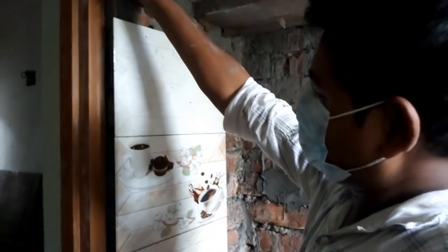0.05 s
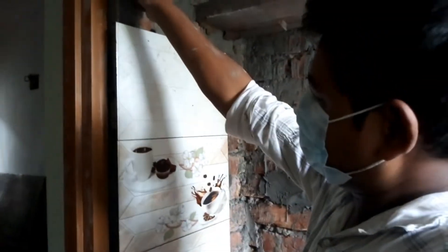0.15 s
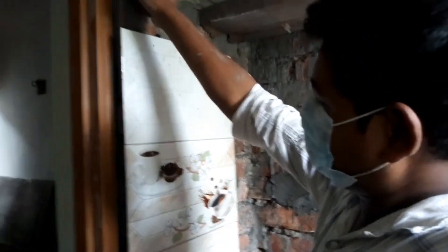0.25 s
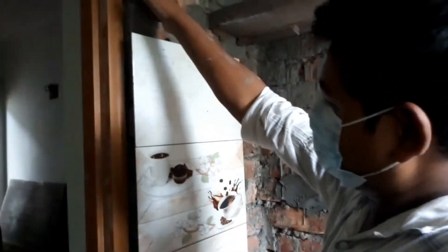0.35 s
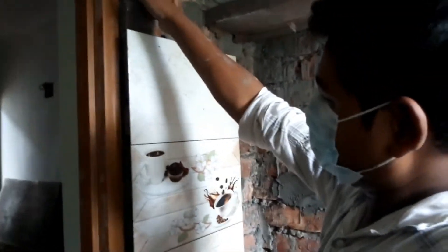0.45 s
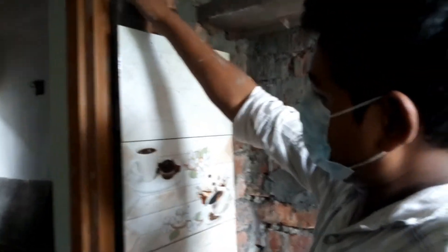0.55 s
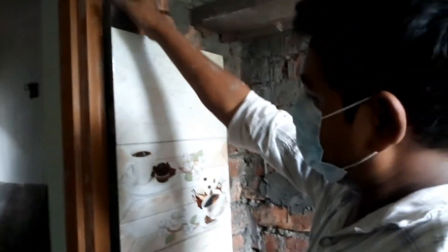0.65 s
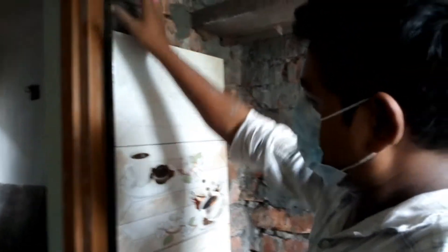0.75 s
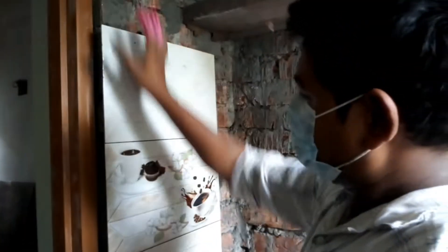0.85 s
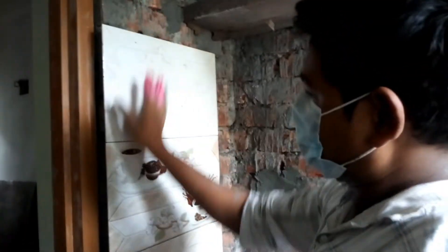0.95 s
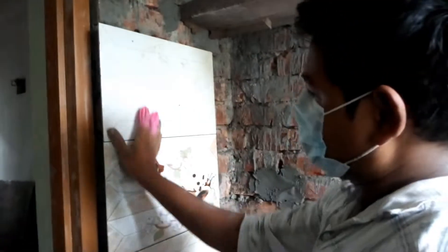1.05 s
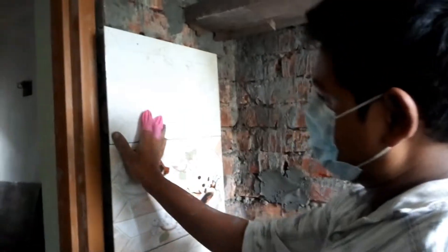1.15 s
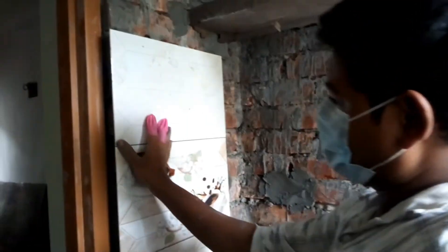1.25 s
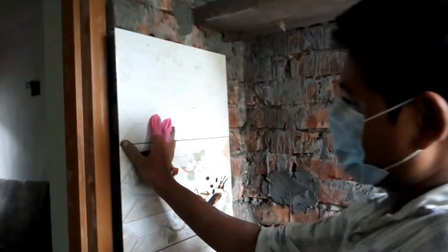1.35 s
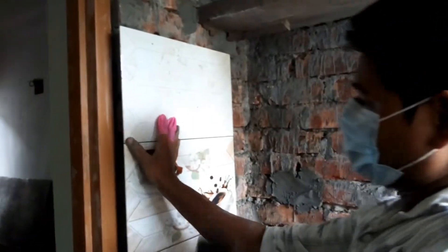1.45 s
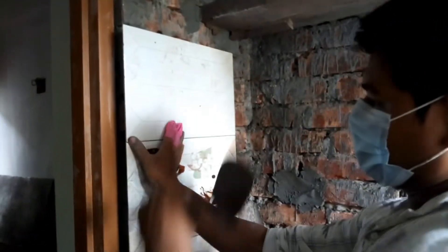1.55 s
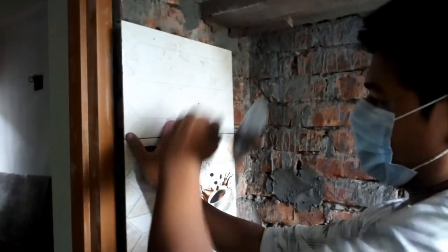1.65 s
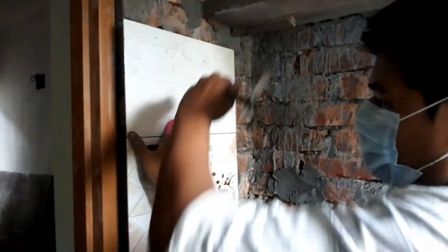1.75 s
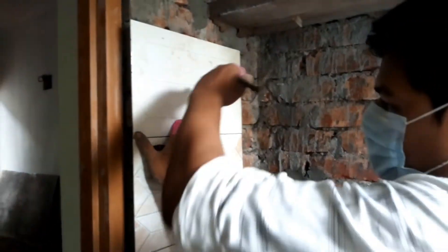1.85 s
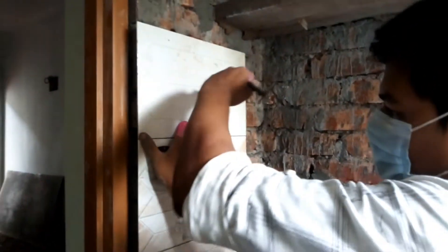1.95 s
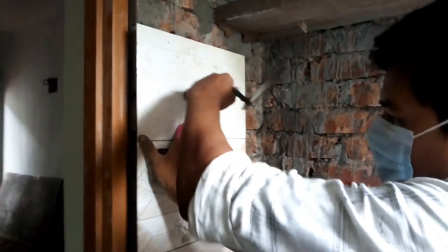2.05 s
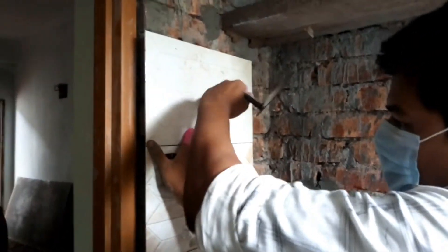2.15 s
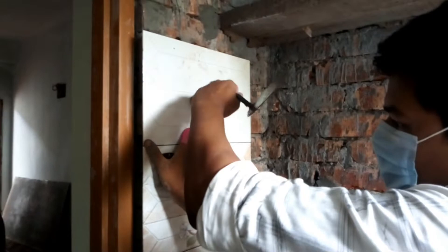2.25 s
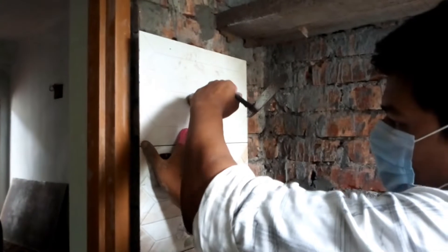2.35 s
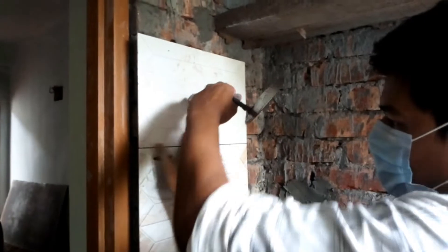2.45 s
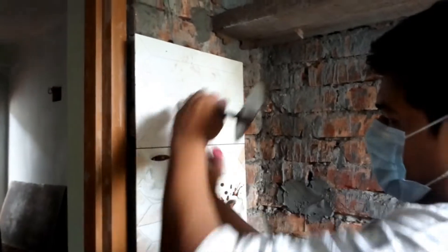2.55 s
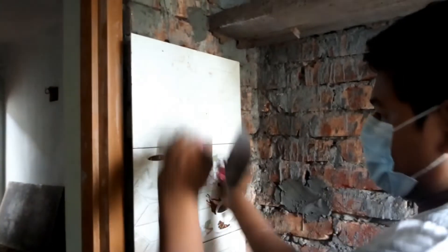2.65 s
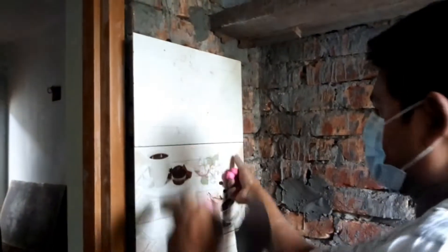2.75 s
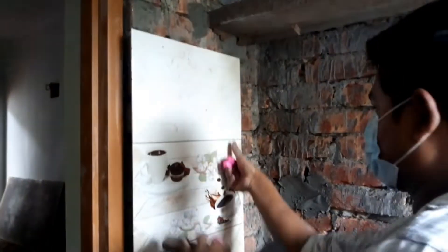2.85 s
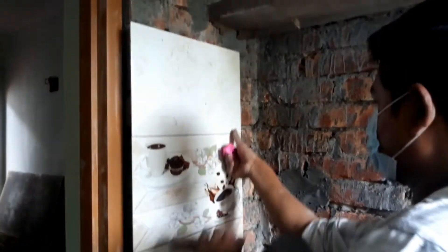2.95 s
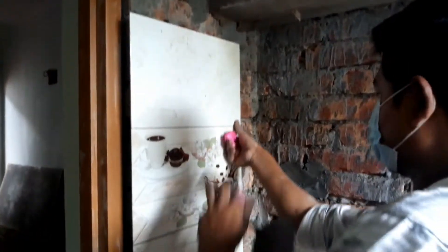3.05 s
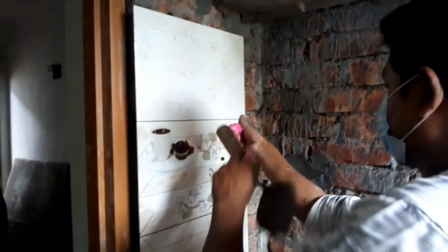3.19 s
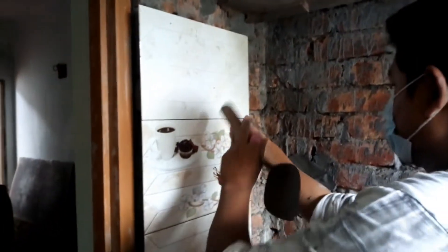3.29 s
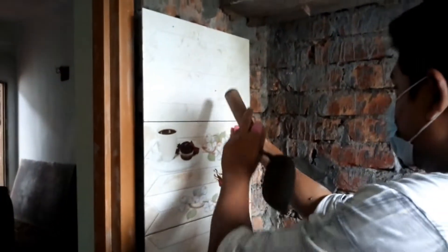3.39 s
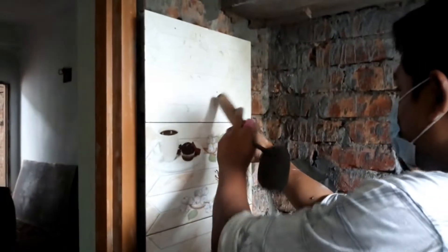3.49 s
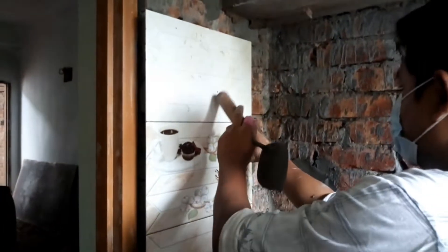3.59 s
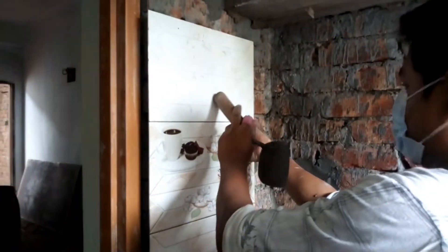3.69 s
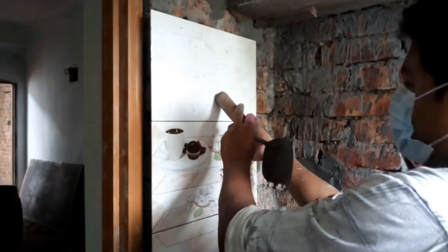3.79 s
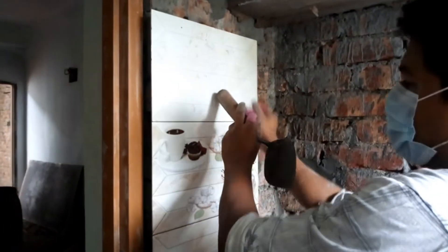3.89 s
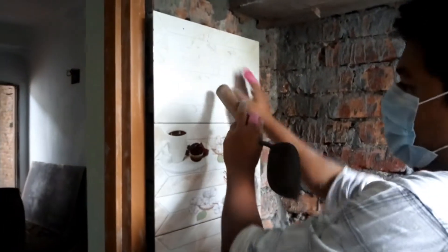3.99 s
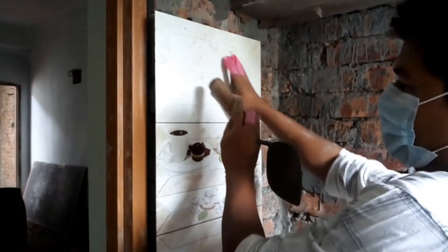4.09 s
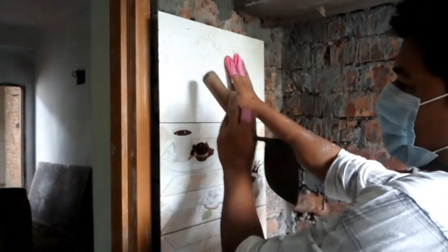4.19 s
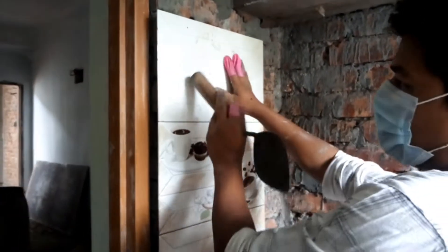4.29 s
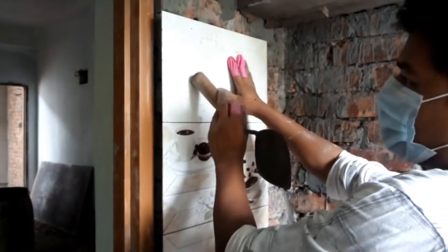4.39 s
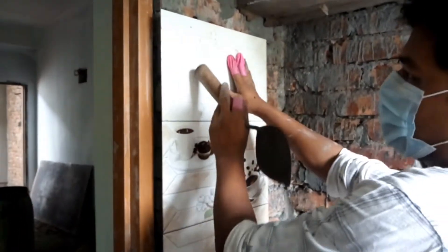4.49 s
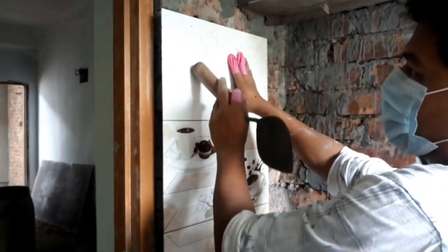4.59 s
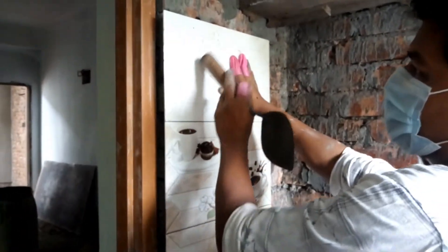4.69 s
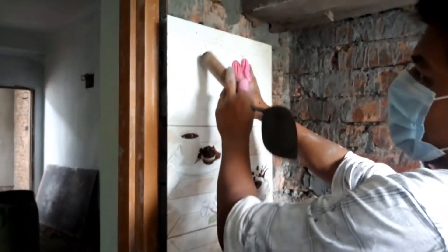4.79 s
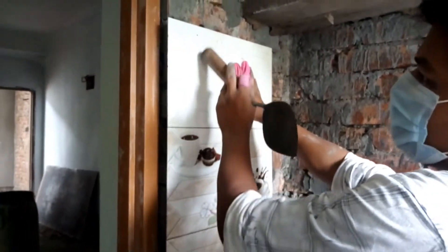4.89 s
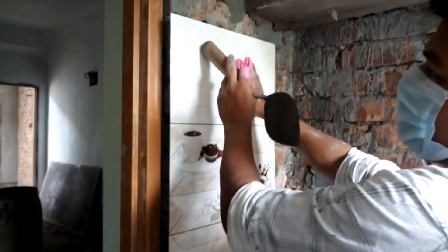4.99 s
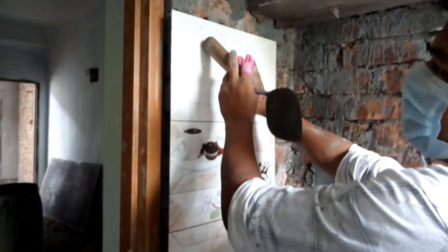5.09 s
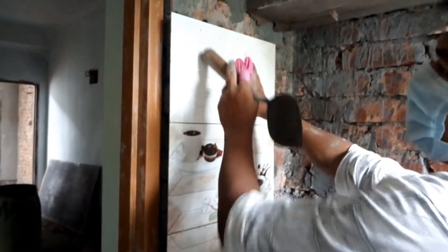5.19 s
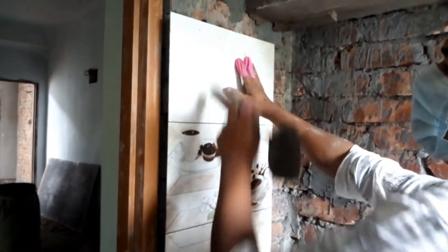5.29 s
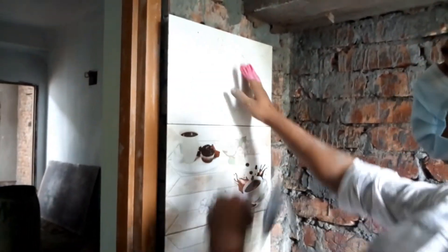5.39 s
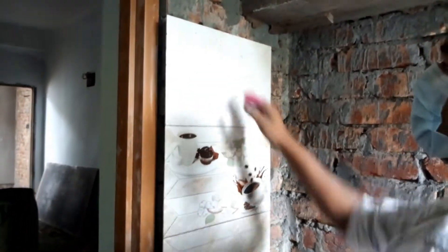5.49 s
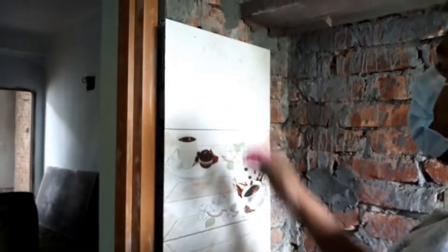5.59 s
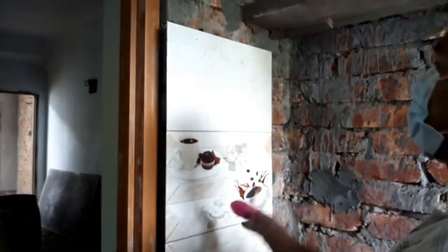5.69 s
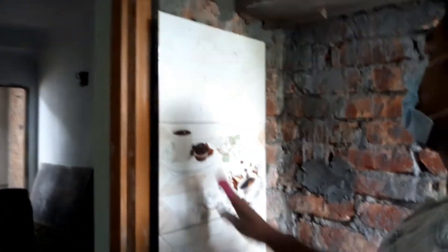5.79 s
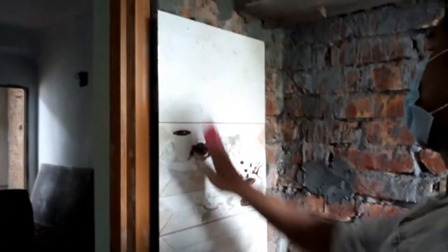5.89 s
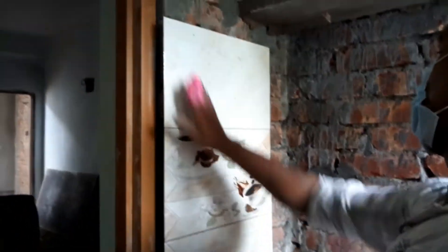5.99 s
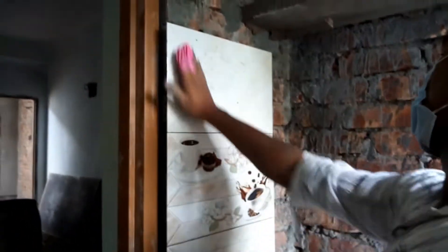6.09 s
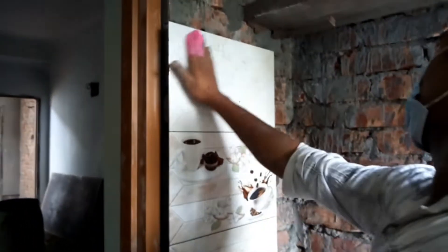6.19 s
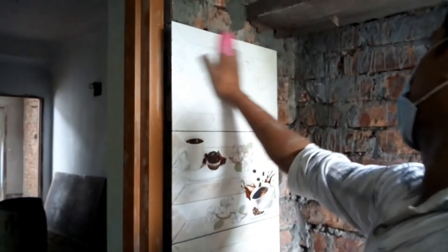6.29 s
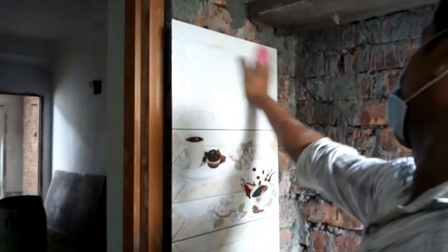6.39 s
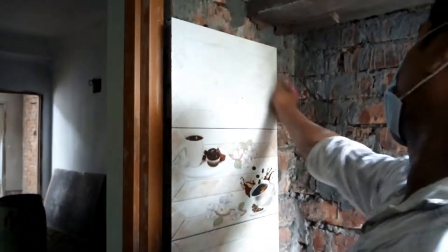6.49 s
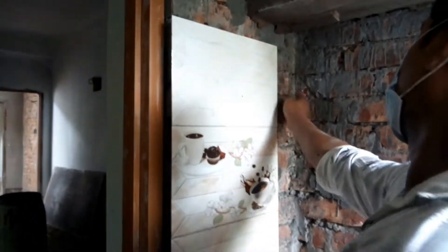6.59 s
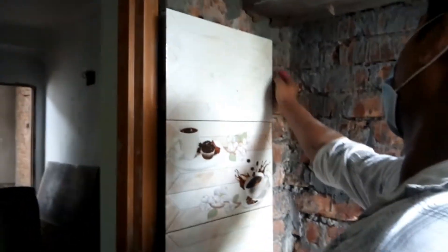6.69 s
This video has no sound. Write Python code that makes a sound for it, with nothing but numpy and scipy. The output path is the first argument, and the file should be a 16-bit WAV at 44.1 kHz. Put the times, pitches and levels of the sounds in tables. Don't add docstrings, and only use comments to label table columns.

```python
import sys
import numpy as np
from scipy import signal
from scipy.fft import rfft, irfft, next_fast_len
from scipy.io import wavfile

SR = 44100
rng = np.random.default_rng(int(sys.argv[2]) if len(sys.argv) > 2 else 0)


def natural_amplitude(level_db):
    exponent = np.asarray(level_db, float) / 20
    return 10 ** exponent


def materialize(psi):
    bounded = np.clip(np.atleast_2d(psi).T, -1, 1)
    quanta = np.round(bounded * 32767).astype(np.int16)
    wavfile.write(sys.argv[1], SR, quanta)


N = 297234


def rms_one(x):
    return x / np.sqrt(np.mean(x ** 2) + 1e-20)


def at_hz(points, hz):
    table = np.array(points)
    return np.interp(np.log(hz), np.log(table[:, 0]), table[:, 1])


def band(x, low_hz, high_hz):
    edges = [low_hz, min(high_hz, .45 * SR)]
    return signal.sosfilt(signal.butter(2, edges, "band", fs=SR, output="sos"), x)


def drift(rate, size):
    knots = rng.standard_normal(int(size / SR * rate) + 2)
    return np.interp(np.arange(size) / SR * rate, np.arange(len(knots)), knots)


def ring(t, hz, t60, phase=0):
    return np.sin(2 * np.pi * hz * t + phase) * natural_amplitude(-60 * t / t60)


def add(out, s, x):
    i = round(s * SR)
    out[i:i + len(x)] += x[:len(out) - i]


# start in seconds, peak in dB, hardness as top Hz, tail in dB, blade in dB.
EDGE_HITS = [
    (2.046, -22, 507, -14, -40),
    (2.059, -7, 3020, -6, -18.5),
    (2.250, -9, 4500, -3.5, -15),
]
# frequency in Hz, level in dB, t60 in seconds.
EDGE_WALL_MODES = [(114.2, -18, 0.93), (168.8, -9, 0.33), (195.6, -29, 0.82), (245.2, -13.5, 1.1),
                   (294.2, -14.5, .9), (361.3, -14.5, 0.855), (458.5, -20, 0.77), (542, -23, 0.88),
                   (583, -27, 0.33), (684, -36.5, 0.6), (844, -29, 0.61)]


def edge_blows():
    return strike(EDGE_HITS, EDGE_WALL_MODES, modes_db=1.0, knock_hz=808, under_db=-3.0,
                  bright_db=6.5, full_boom_db=-0.4, boom_lasts=1.406)


# start in seconds, peak in dB, hardness as top Hz, tail in dB, blade in dB.
FACE_TAPS = [
    (4.370, -14, 952, -13.5, -35),
    (4.572, -8, 3250, -11, -25),
    (4.844, -8.5, 2800, -11, -30.5),
    (5.009, -7.5, 3440, -12, -29),
]
# frequency in Hz, level in dB, t60 in seconds.
FACE_WALL_MODES = [(112.82, -9, 0.94), (159.8, -1, 0.62), (292, -6.5, 0.54), (366, -18, 0.61),
                   (555, -3, 0.49), (656, -6, 0.56), (847, 1, 0.203), (915, -20, 0.79), (1037, -5.5, 0.21)]


def face_taps():
    return strike(FACE_TAPS, FACE_WALL_MODES, modes_db=-8.0, knock_hz=842.0, under_db=-6.0,
                  bright_db=1.0, full_boom_db=-1.0, boom_lasts=0.987)


# start in seconds, peak in dB, hardness as top Hz, tail in dB, blade in dB.
LOW_TAPS = [
    (3.571, -21.5, 820, -12, -45),
    (3.698, -6, 3340, -11, -27.5),
    (5.315, -52, 320, -10.5, -42),
]
# frequency in Hz, level in dB, t60 in seconds.
LOW_WALL_MODES = [(111.5, -8.5, 0.42), (162.5, -6, 0.52), (244.3, 0.5, 0.65), (323.95, 1, 0.55),
                  (520, 2, 0.2), (616, -1, 0.252), (798, -5.5, 0.45), (837, 1, 0.33)]


def low_face_taps():
    return strike(LOW_TAPS, LOW_WALL_MODES, modes_db=-10.0, knock_hz=674.0, under_db=-30.5,
                  bright_db=-1.0, full_boom_db=-1.1, boom_lasts=0.97)


# frequency in Hz, level in dB, t60 in seconds.
BLADE_MODES = [(1096, -5.5, 0.5), (1107, 2, 0.58), (1590, -10.5, 0.26), (1808, -10, 0.26),
               (2110, -11.5, 0.36), (3220, -16, 0.27)]
# frequency in Hz, width in Hz, level in dB.
TILE_PLATE_MODES = [(1343, 100, -7), (1590, 50, -9), (1845, 64, -5), (2203, 80, 1.5), (2640, 90, -4.5),
                    (2824, 75, -4), (3170, 70, 5.5)]
FULL_BLOW_DB, BOOM_PER_SOFT_DB = -11, 0.3518


def strike(hits, modes, modes_db, knock_hz, under_db, bright_db, full_boom_db, boom_lasts):
    out, t = np.zeros(N), np.arange(round(.95 * SR)) / SR
    for s, peak_db, top_hz, tail_db, blade_db in hits:
        boom_db = full_boom_db + BOOM_PER_SOFT_DB * (FULL_BLOW_DB - peak_db)
        knock = ring(t, knock_hz, 0.015) + natural_amplitude(under_db) * ring(t, knock_hz * 0.7018, 0.041)
        knock = -knock * (1 - np.exp(-(t / 0.00053) ** 2))

        wall = 0
        for hz, db, t60 in modes:
            chance, phase = rng.standard_normal(2)
            mode_db = db + 1.5 * chance + 4.7 * drift(22, len(t)) + boom_db * (hz < 400)
            wall = wall + natural_amplitude(mode_db) * ring(t, hz, t60, 3 * phase)
        wall = natural_amplitude(modes_db) * wall * (1 - np.exp(-(t / 0.0058) ** 2))

        blade = sum(natural_amplitude(db + 2.6 * drift(25, len(t))) * ring(t, hz, t60) for hz, db, t60 in BLADE_MODES)
        blade = blade * (1 - np.exp(-t / 0.014))

        diffuse = room_tail(t, boom_db, bright_db, boom_lasts)
        tail = diffuse
        for hz, width, db in TILE_PLATE_MODES:
            plate = band(diffuse, hz - width / 2, hz + width / 2)
            tail = tail + natural_amplitude(db + 1.2 * rng.standard_normal()) * plate

        blow = natural_amplitude(1.0) * knock + natural_amplitude(tail_db) * (tail + wall)
        soft = np.exp(-2 * np.pi * 1.4 * top_hz / SR)
        blow = signal.lfilter([1 - soft], [1, -soft], blow)
        blow = signal.sosfilt(signal.butter(8, top_hz, fs=SR, output="sos"), blow)
        add(out, s + 0.00049, natural_amplitude(peak_db) * (blow + natural_amplitude(blade_db) * blade))
    return out


# frequency in Hz, level in dB per Hz.
TAIL_COLOUR = [(18, -52), (30, -13.5), (60, -16), (146, -3.5), (229, 4), (417, -6.5), (540, -1.5),
               (811, -6), (902, -6), (1090, -13), (1220, -9), (2120, -18), (5000, -48), (6500, -76),
               (11000, -120)]
# frequency in Hz, t60 in seconds.
ROOM_DECAY = [(60, 0.69), (250, 0.74), (550, 0.53), (1200, 0.58), (2500, 0.25), (5000, 0.27)]


def room_tail(t, boom_db, bright_db, boom_lasts):
    edges = 40 * 2 ** np.arange(0, 7.2, 1 / 3)
    white, out = rng.standard_normal((2, len(t))), 0
    for k, (low, high) in enumerate(zip(edges, edges[1:])):
        hz = np.sqrt(low * high)
        tilt_db = at_hz([(300, boom_db), (500, 0.0044), (1000, 0.007), (2500, bright_db)], hz)
        colour_db = at_hz(TAIL_COLOUR, hz) + tilt_db
        rise = 1 - np.exp(-(t / (0.00067 + 3.7 / hz)) ** 2)
        t60 = at_hz(ROOM_DECAY, hz) * at_hz([(330, boom_lasts), (480, 0.96)], hz)
        level_db = colour_db + 2.08 * drift(13.75, len(t)) - 60 * t / t60
        out = out + natural_amplitude(level_db) * rise * band(white[k % 2], low, high)
    return natural_amplitude(12.5) * out


# start in seconds, level in dB, frequency in Hz, t60 in seconds.
BLADE_RASPS = [
    (2.060, -41.5, 4500, 0.23),
    (2.061, -48, 3950, 0.16),
    (2.060, -52.5, 6730, 0.284),
    (2.251, -44.5, 4220, 0.25),
    (6.268, -54, 13300, .03),
]


def steel_rasp():
    out, t = np.zeros(N), np.arange(round(.95 * SR) // 3) / SR
    for s, level_db, hz, t60 in BLADE_RASPS:
        rasp = rms_one(band(rng.standard_normal(len(t)), hz * .95, hz * 1.05))
        add(out, s, natural_amplitude(level_db - 7.0 - 60 * t / t60) * rasp)
    return out


# time in seconds, level in dB.
FINGER_PRESSURE = [
    (6.166, -63),
    (6.172, -52.5),
    (6.27, -46),
    (6.32, -47.5),
    (6.345, -50),
    (6.42, -46.5),
    (6.5, -49),
    (6.6, -68),
    (6.62, -67.5),
]
# frequency in Hz, width in Hz, level in dB.
GLAZE_MODES = [(2380, 140, -3.5), (3900, 330, -3.5), (4500, 300, -1.5), (4970, 560, -1), (5770, 510, 3),
               (6070, 190, -1), (7060, 320, -7), (8040, 330, -13)]
# frequency in Hz, width in Hz, level in dB.
NAIL_HIGHS = [(9600, 360, -3), (10940, 500, -0.5), (13500, 4000, -2)]
NAIL_DB, NAIL_FOLLOWS = -69, 1.1


def finger_rub(grain_db, skirt_db):
    out, (s, db) = np.zeros(N), np.transpose(FINGER_PRESSURE)
    t = np.arange(s[0], s[-1], 1 / SR)
    level_db = np.interp(t, s, db)
    slips = rng.standard_normal(len(t)) * natural_amplitude(grain_db * drift(153.0, len(t)))
    glaze, nail = 0, 0
    for hz, width, mode_db in GLAZE_MODES:
        mode = band(slips, hz - width / 2, hz + width / 2)
        glaze = glaze + natural_amplitude(mode_db + 2.4 * drift(25.0, len(t))) * mode
    skirt = rms_one(band(band(slips, 3100, 7400), 3400, 7600))
    body = rms_one(rms_one(glaze) + natural_amplitude(skirt_db) * skirt)
    for hz, width, high_db in NAIL_HIGHS:
        high = rms_one(band(slips, hz - width / 2, hz + width / 2))
        nail = nail + natural_amplitude(high_db + 1.9 * drift(21, len(t))) * high
    nail_db = NAIL_DB + NAIL_FOLLOWS * (level_db - level_db.max())
    add(out, t[0], natural_amplitude(level_db) * body + natural_amplitude(nail_db) * nail)
    return out


# start in seconds, peak in dB, pitch in Hz.
GRIT_TICKS = [
    (0.2106, -33, 2260),
    (3.6859, -38.5, 1620),
    (4.99, -36, 1500),
    (4.9937, -45, 1550),
    (5.06, -32.5, 1590),
    (5.1743, -55, 10000),
    (5.3045, -33.5, 3900),
    (5.7173, -39, 5000),
    (6.2693, -40, 4710),
]
# start in seconds, frequency in Hz, t60 in seconds.
FAR_TOOL = (.24, 1147, .9)


def ticks():
    out, t = np.zeros(N), np.arange(SR) / SR
    for s, peak_db, hz in GRIT_TICKS:
        burst = rms_one(band(rng.standard_normal(2000), hz / 3.0, hz * 1.86))
        add(out, s, natural_amplitude(peak_db - 15.0 - 60 * t[:2000] / 0.049) * burst)
    s, hz, t60 = FAR_TOOL
    add(out, s, natural_amplitude(-53.5) * ring(t, hz, t60) * (1 - np.exp(-t / 0.0124)))
    return out


def stroke(row, shape):
    s, length, level_db, first_hz, last_hz = row
    attack, release, sag_db = shape
    t = np.arange(0, length, 1 / SR)
    rise = t / min(attack, length / 3)
    fall = (length - t) / min(release, length / 2)
    edge = np.clip(np.minimum(rise, fall), 0, 1)
    gain = natural_amplitude(level_db - sag_db * t / length) * np.sin(np.pi / 2 * edge) ** 2
    return gain, first_hz + (last_hz - first_hz) * t / length


# start in seconds, length in seconds, level in dB, first Hz, last Hz.
SLEEVE_SLIDES = [(4.965, 0.074, -72, 9700, 9600), (5.045, .055, -66.5, 9300, 9600),
                 (5.25, 0.16, -64.5, 9800, 9900), (5.46, .26, -61, 9860, 9700),
                 (5.62, .22, -69, 9600, 9400), (5.85, .3, -78, 10000, 10000)]
SCUFF_SLIDES = [(0.0, .14, -56, 2520, 2520), (1.07, 0.174, -60, 2520, 2502), (1.38, .34, -60, 2400, 2606),
                (3.86, 0.31, -53.5, 2700, 2410), (4.1, .32, -57.5, 2435, 2920),
                (6.36, .16, -66, 2430, 2600)]
RUSTLE_SLIDES = [(.205, .125, -53.5, 2347, 2347), (5.29, 0.089, -76, 2300, 2380)]
HIGH_RUSTLE_SLIDES = [(1.03, 0.167, -64, 6100, 6460), (1.5, 0.18, -60, 6520, 6480),
                      (5.5, .36, -61, 5820, 5860), (5.8, .36, -67.5, 5860, 5980)]
# attack in seconds, release in seconds, sag over the stroke in dB.
SLIDE_ENVELOPE = (0.066, 0.064, 2.2)


def sliding(gestures, width, skirt_db, grain_db, spread):
    out = np.zeros(N)
    for row in gestures:
        gain, hz = stroke(row, SLIDE_ENVELOPE)
        centre = hz.mean()
        narrow, white = rng.standard_normal((2, len(hz)))
        narrow = signal.sosfilt(signal.butter(2, width * centre / 2, fs=SR, output="sos"), narrow)
        core = rms_one(narrow * np.sin(2 * np.pi * np.cumsum(hz) / SR))
        skirt = band(white, centre / spread, centre * spread)
        skirt = rms_one(band(skirt, centre / spread, centre * spread))
        grain = natural_amplitude(grain_db * drift(90, len(hz)))
        add(out, row[0], gain * grain * (core + natural_amplitude(skirt_db) * skirt))
    return out


# start in seconds, length in seconds, level in dB, first Hz, last Hz.
MIDDLE_BIRD_NOTES = [(0.331, 0.21, -56.5, 4290, 4100), (0.487, 0.23, -53.5, 4007, 3950),
                     (0.724, 0.26, -48.5, 4264, 4216), (0.993, 0.18, -57, 4320, 4150),
                     (6.47, .3, -63, 4217, 3824)]
HIGH_BIRD_NOTES = [(0.971, .22, -53.5, 4760, 4540), (1.08, .26, -54.5, 4470, 3950),
                   (1.19, .09, -54, 4170, 3610), (1.38, .14, -54.5, 4380, 4200)]
LOW_BIRD_NOTES = [(1.24, .13, -53.5, 3544, 3480), (1.64, .23, -54.5, 3444, 3350)]
TOP_BIRD_NOTES = [(1.0, 0.34, -65, 5500, 5370), (1.54, .16, -57, 5360, 5360), (1.86, 0.13, -65, 5260, 5350)]
TRILL_SPREAD = [44.4, 172, 100, 150]
# attack in seconds, release in seconds, sag over the note in dB.
NOTE_ENVELOPE = (0.02, 0.059, 6)


def birds(echo_s, direct_db):
    out = np.zeros(N)
    singers = [MIDDLE_BIRD_NOTES, HIGH_BIRD_NOTES, LOW_BIRD_NOTES, TOP_BIRD_NOTES]
    for notes, spread_hz in zip(singers, TRILL_SPREAD):
        for row in notes:
            gain, hz = stroke(row, NOTE_ENVELOPE)
            trilled_hz = hz + spread_hz * drift(260, len(hz))
            whistle = np.sin(2 * np.pi * np.cumsum(trilled_hz) / SR)
            add(out, row[0], gain * natural_amplitude(2.08 * drift(35, len(hz))) * whistle)
    t = np.arange(SR // 2) / SR
    echoes = rng.standard_normal(len(t)) * natural_amplitude(-60 * t / echo_s)
    echoed = signal.fftconvolve(out, echoes / np.linalg.norm(echoes))[:N]
    return natural_amplitude(direct_db) * out + natural_amplitude(2.5) * echoed


# time in seconds, level in dB.
STREET_SWING = [(0, 2.5), (.8, 0.5), (2.0, 1), (3.5, -1), (5.4, -2), (6.74, -2.5)]
# frequency in Hz, level in dB per Hz.
RUMBLE_COLOUR = [(15, -54.5), (25, -12.5), (54, -23.5), (107, 1), (124, -3), (139, -16.5), (184, -2),
                 (226, -11), (271, -8), (325, -12.5), (700, -17), (910, -47.5), (1540, -120)]
MURMUR_COLOUR = [(290, -30), (500, -7.5), (672, -21), (696, -8.5), (952, -9), (1230, -8.5), (1810, -8),
                 (2100, -2), (4000, -12), (5200, -40.5), (8800, -120)]
HISS_COLOUR = [(2060, -39.5), (3500, -27.5), (3840, -9), (4770, 1.5), (4920, -1), (5160, 4), (5700, -3),
               (6370, -1), (7710, -4.5), (9640, -20), (13400, -22.5), (15300, -26.5)]
# level in dB, share of the street's swing.
LAYER_LEVELS = [(-62, 0.28), (-60.5, 1.4), (-61.5, 1.14)]


def room_tone(patchy_db):
    street_db = np.interp(np.arange(N) / SR, *np.transpose(STREET_SWING))
    size = next_fast_len(N)
    hz, edges = np.arange(size // 2 + 1) * SR / size + 1, 20 * 2 ** np.arange(11)
    colours, out = [RUMBLE_COLOUR, MURMUR_COLOUR, HISS_COLOUR], 0
    for colour, (level_db, share), depth_db in zip(colours, LAYER_LEVELS, patchy_db):
        spectrum = rfft(rng.standard_normal(size)) * natural_amplitude(at_hz(colour, hz))
        layer = np.zeros(N)
        for low, high in zip(edges, edges[1:]):
            if colour[0][0] < high and low < colour[-1][0]:
                octave = irfft(spectrum * (hz >= low) * (hz < high), size)[:N]
                layer += natural_amplitude(depth_db * drift(9, N)) * octave
        out = out + natural_amplitude(level_db + share * street_db) * rms_one(layer)
    return out


def scene():
    trowel = edge_blows() + face_taps() + low_face_taps() + steel_rasp()
    hands = finger_rub(grain_db=1.0, skirt_db=-9.5)
    hands += sliding(SLEEVE_SLIDES, width=0.13, skirt_db=-8, grain_db=1.2, spread=1.6)
    hands += sliding(SCUFF_SLIDES, width=0.14, skirt_db=-26.5, grain_db=1.5, spread=1.02)
    cloth = sliding(RUSTLE_SLIDES, width=0.34, skirt_db=-0.7, grain_db=2.98, spread=2.3)
    cloth += sliding(HIGH_RUSTLE_SLIDES, width=0.21, skirt_db=-12, grain_db=2.41, spread=2.07)
    outside = birds(echo_s=0.3, direct_db=-0.5) + room_tone(patchy_db=(1.5, 1.2, .4))
    return (trowel + hands + cloth + ticks() + outside)[None]


def top_cut(x):
    return signal.sosfilt(signal.butter(12, 15460, fs=SR, output="sos"), x)


def record(dry):
    low_pass = signal.cheby2(14, 50, 15850, fs=SR, output="sos")
    mix = signal.sosfilt(low_pass, dry)
    return top_cut(mix)


dry = scene()
out = record(dry)
materialize(out)
```